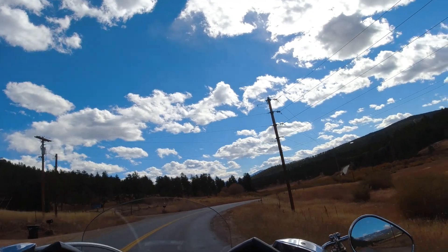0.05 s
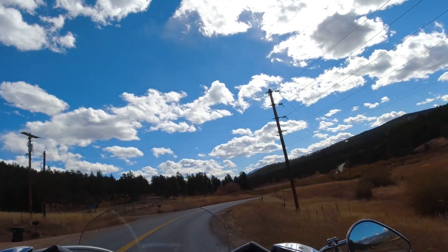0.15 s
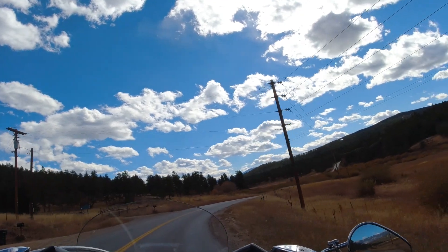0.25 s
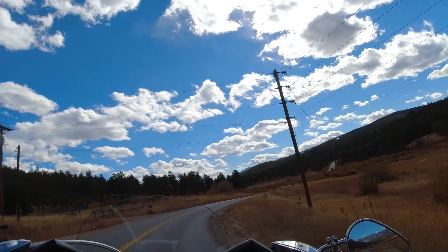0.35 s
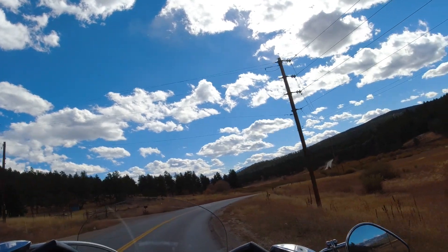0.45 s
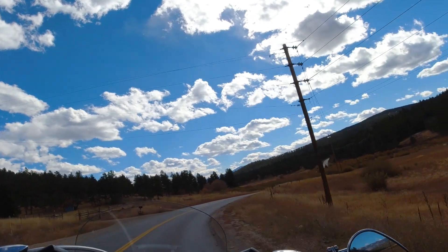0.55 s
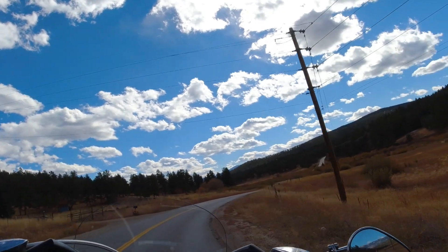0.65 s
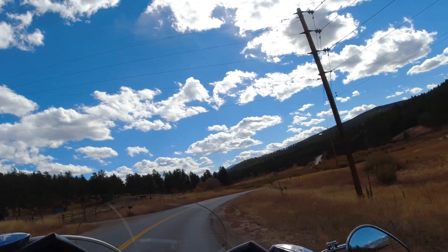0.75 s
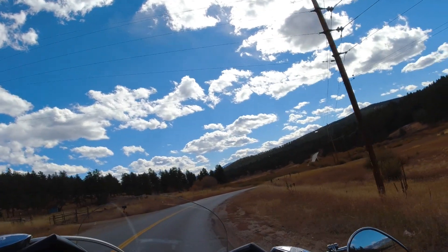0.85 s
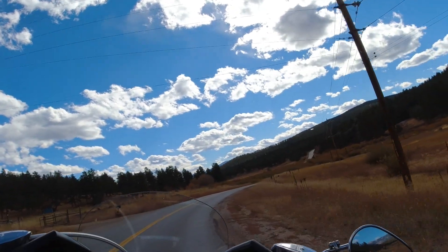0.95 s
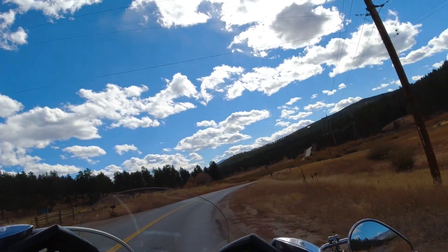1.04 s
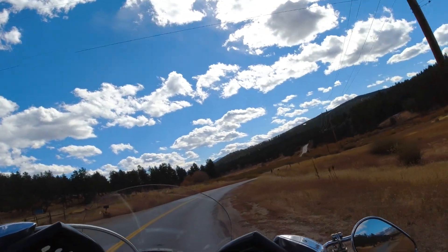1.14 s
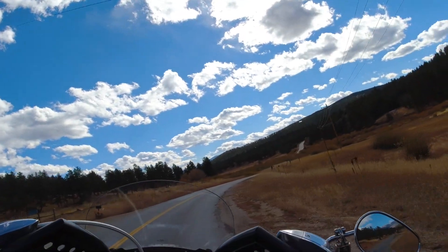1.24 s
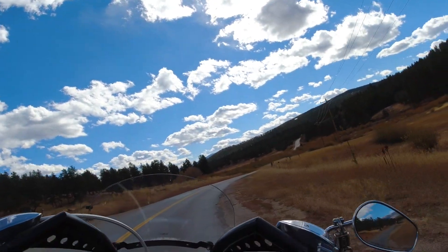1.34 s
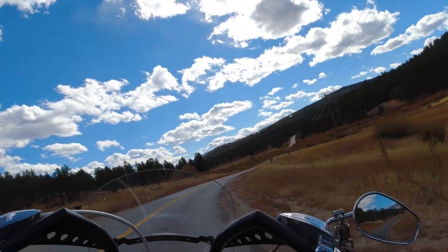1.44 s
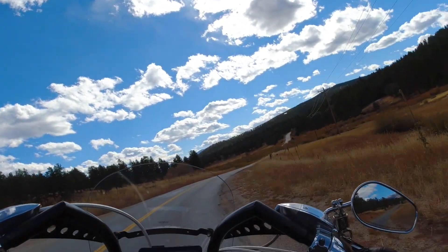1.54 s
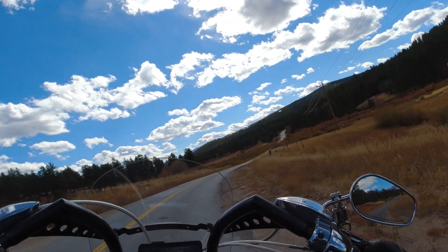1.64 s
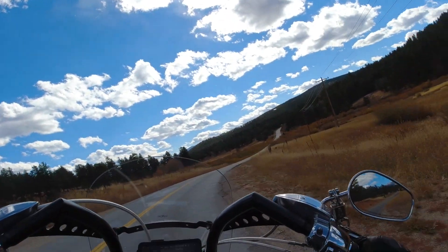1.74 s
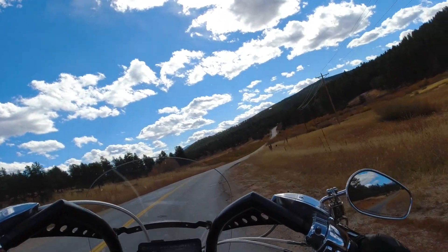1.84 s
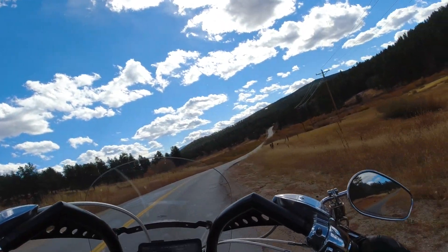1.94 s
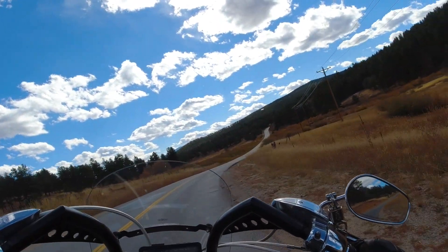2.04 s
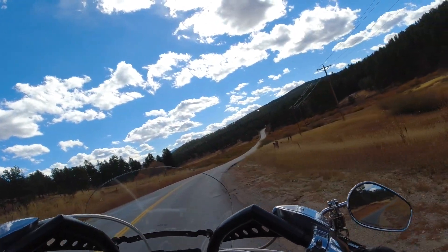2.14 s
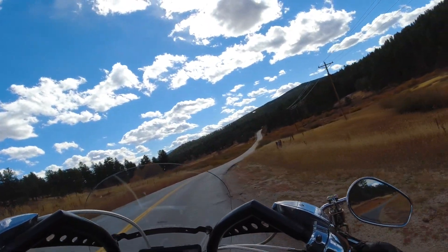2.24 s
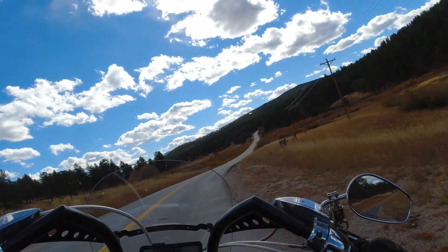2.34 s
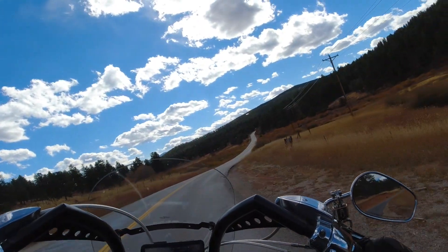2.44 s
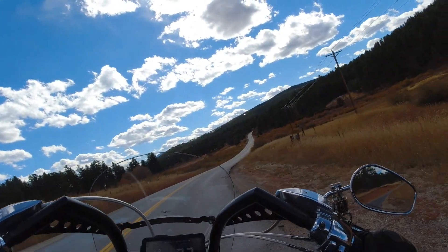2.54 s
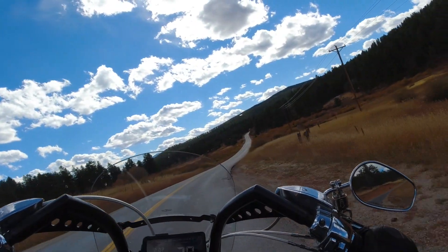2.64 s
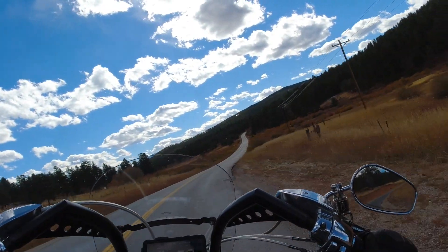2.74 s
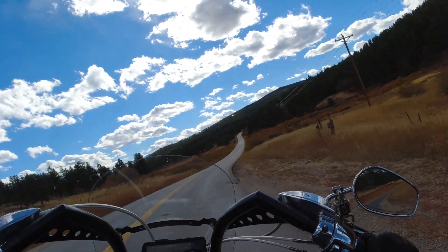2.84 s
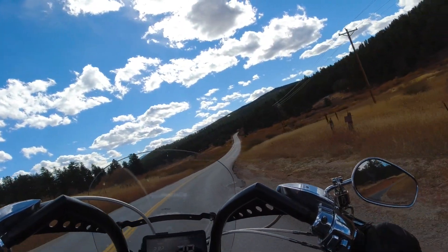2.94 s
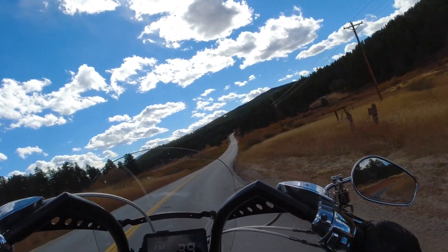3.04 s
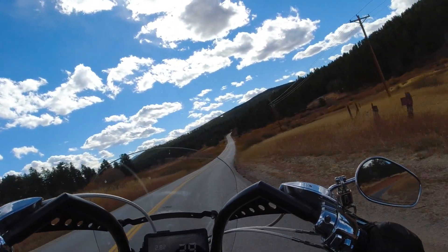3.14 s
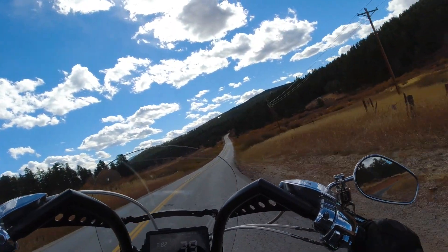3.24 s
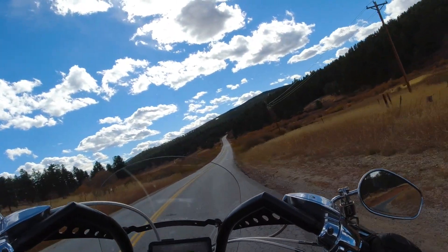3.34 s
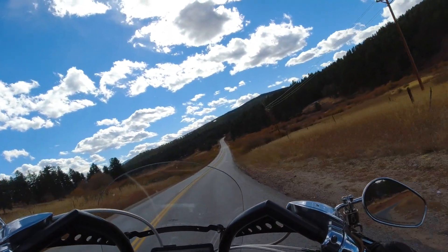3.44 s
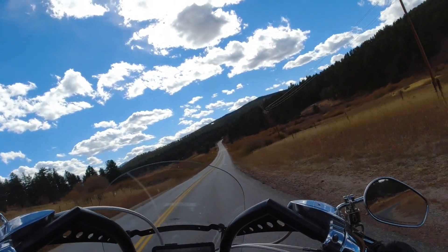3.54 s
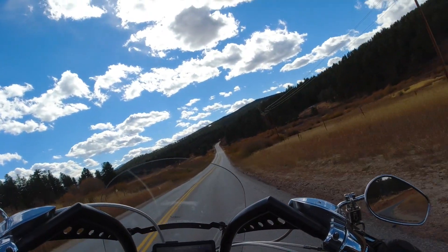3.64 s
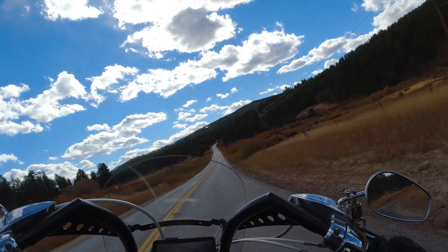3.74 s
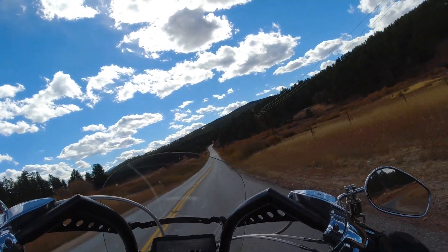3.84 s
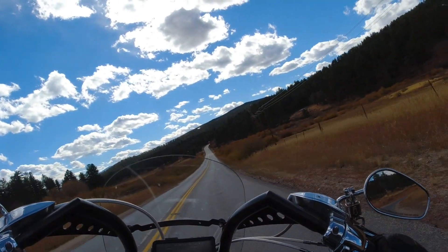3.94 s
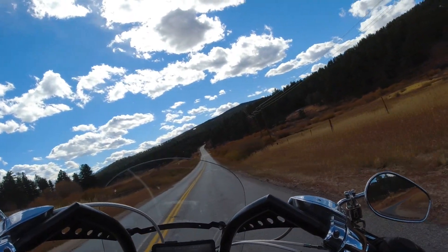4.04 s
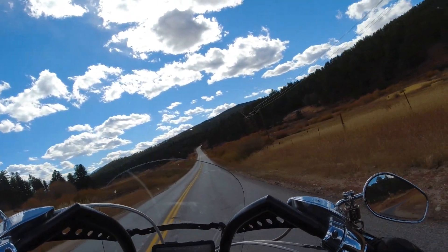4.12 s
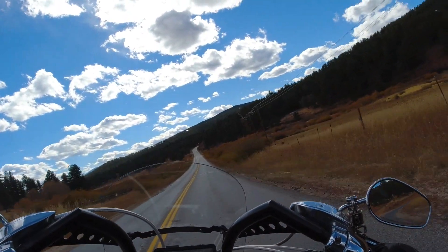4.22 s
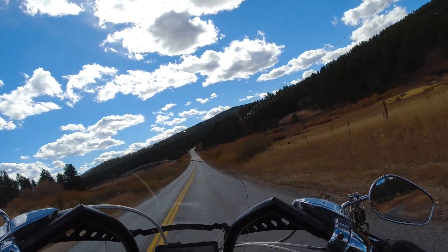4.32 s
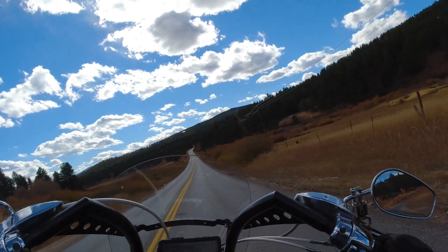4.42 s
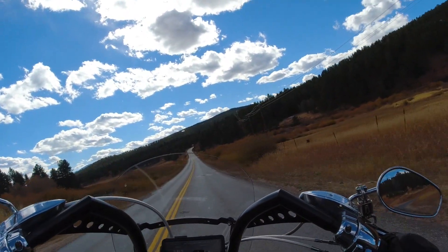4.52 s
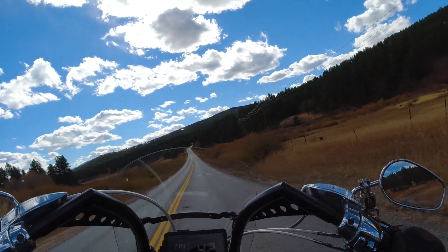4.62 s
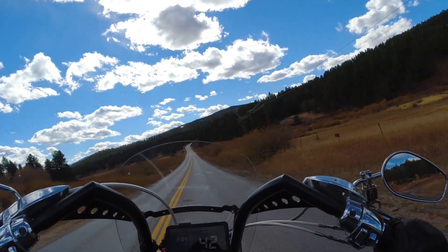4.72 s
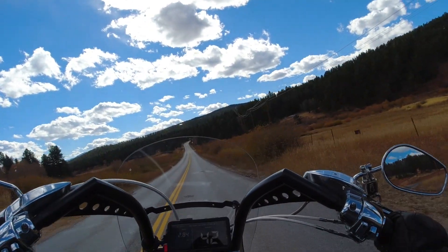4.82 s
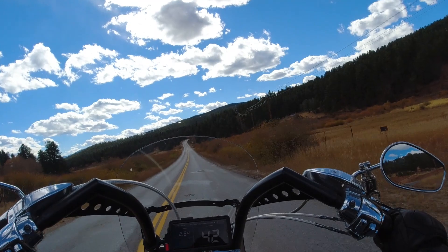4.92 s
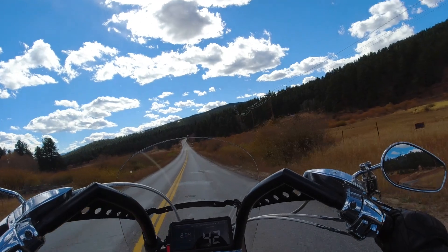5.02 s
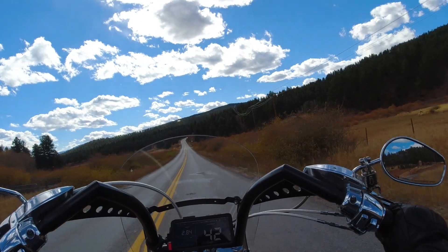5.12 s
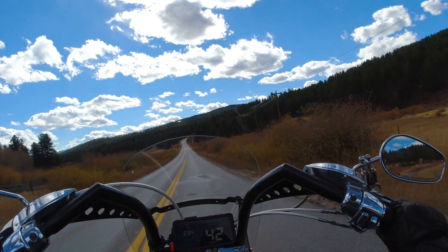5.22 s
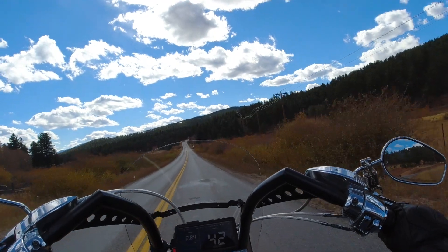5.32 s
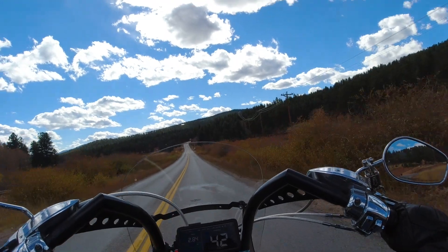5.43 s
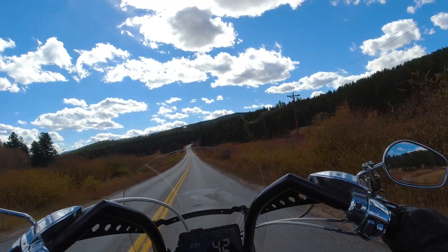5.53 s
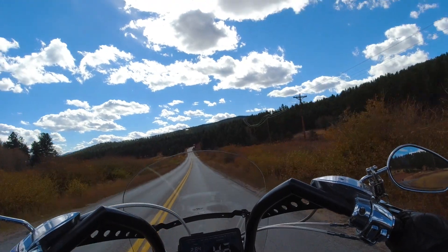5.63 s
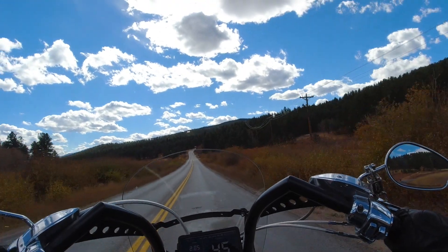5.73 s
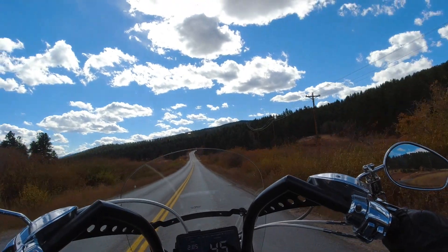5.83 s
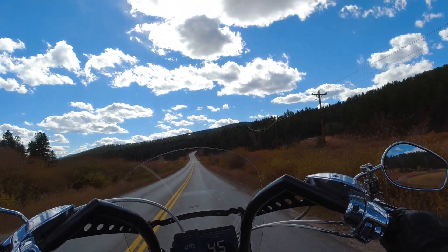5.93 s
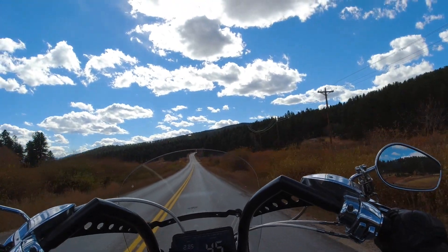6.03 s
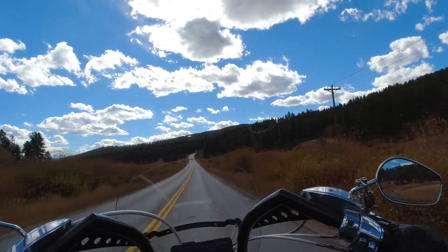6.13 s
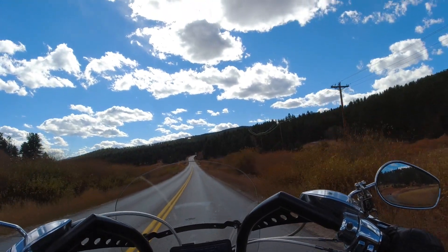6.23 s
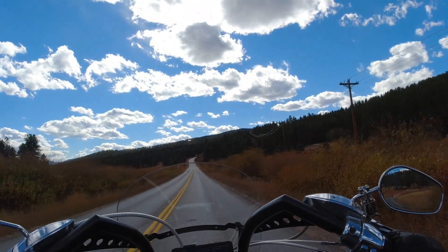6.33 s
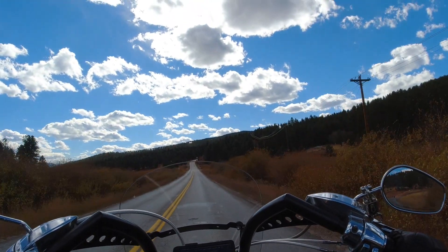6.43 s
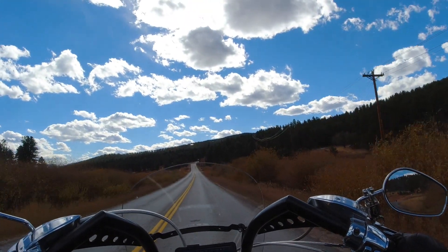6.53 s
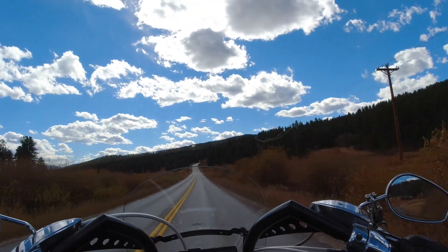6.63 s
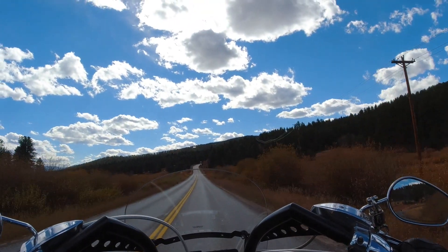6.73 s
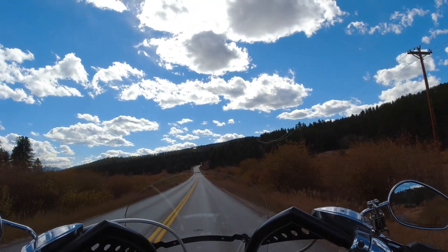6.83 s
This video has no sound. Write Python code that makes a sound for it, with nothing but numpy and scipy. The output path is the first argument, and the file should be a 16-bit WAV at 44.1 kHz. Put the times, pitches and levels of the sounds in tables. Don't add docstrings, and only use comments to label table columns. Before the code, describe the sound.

Close on-board sound of a large V-twin motorcycle on an open road, heard at the rider's chest. From 0 to 1.5 s it cruises with a heavy, uneven double thump, about sixteen pairs a second, over low buffeting wind and a steady rush of air and tyres. From 1.6 s the throttle opens a little, bringing more rasp, valve clatter and sparse crackles; a loose heat shield ticks more clearly between 1.9 and 2.9 s. The pace climbs gradually, with a stronger gust near 4 s. At about 4.8 s the engine opens up, louder, brighter and raspier, with rising gear whine. Around 5.3 s a bump gives a deep, dull knock with blasts of wind, and the low boom becomes fuller. The hard pull continues to roughly 6.6 s, about twenty-one pairs a second, then the throttle shuts and exhaust drops abruptly beneath the wind until the end at 6.9 s.

```python
import sys
import numpy as np
from scipy import signal
from scipy.fft import rfft, irfft, next_fast_len
from scipy.io import wavfile
from scipy.ndimage import uniform_filter1d

SR = 44100
rng = np.random.default_rng(int(sys.argv[2]) if len(sys.argv) > 2 else 0)


def nominal_scale(level):
    x = np.asarray(level, float) / 20
    return 10 ** x


def generate_wav(signal):
    frames = np.transpose(np.atleast_2d(signal))
    scaled = np.clip(frames, -1, 1) * 32767
    pcm = np.round(scaled).astype(np.int16)
    wavfile.write(sys.argv[1], SR, pcm)


N = 302967
FFT_SIZE = next_fast_len(N + SR)
HZ = np.arange(FFT_SIZE // 2 + 1) * SR / FFT_SIZE

# start_s, four-stroke cycle rate_hz
SPEED = [(0, 15.809), (0.7, 15.804), (1.4, 16.105), (2.2, 16.591), (2.6, 16.987), (3.3, 17.423),
         (3.7, 17.843), (4.2, 18.118), (4.9, 18.813), (5.7, 20.147), (6.5, 21.426), (6.87, 21.397)]
# start_s, level_db
THROTTLE = [(0, -10), (.3, -8), (.9, -10), (1.6, -5), (1.78, -1.5), (2.1, -3.5), (2.7, -1.3), (3.6, -2),
            (4.65, -0.5), (4.85, 4), (5.1, 9), (5.55, 12), (6.0, 11), (6.3, 11), (6.62, 10), (6.72, 0),
            (6.87, -16)]
# centre_s, extra_db, half_width_s
SURGES = [
    (.95, 1.5, 0.32),
    (2.7, 1.0, 0.13),
    (3.92, 1.5, .12),
    (4.75, 2, 0.19),
]
START_CYCLE, REFERENCE_HZ = -0.693, 18.2
REAR_FIRES = 315 / 720

# cruising level_db, db per db of throttle, db per hz of crank speed
THUMP_LAW, RING_LAW, SIZZLE_LAW = (-30, 0.26, 1), (-42.5, 0.46, 0.64), (-71.5, 0.33, 1.4)
SHIELD_LAW, BUFFET_LAW, RUSH_LAW = (-60, 0.78, 0.1), (-37.5, 0.1, 0.8), (-45, 0.34, 0.78)
RASP_DB = -44

# pitch_hz, level_db per hz
BUFFET = [(12, -1.5), (25, 1.5), (40, 1), (60, -10), (100, -21), (200, -15.5), (300, -26), (500, -28.5),
          (1500, -86)]
# pitch_hz, level_db per hz
RUSH = [(90, -4), (170, -0.5), (250, -7), (311, -10), (620, -15.5), (811, -26.5), (1250, -20.5),
        (1850, -25.5), (2300, -26.5), (2960, -33), (4980, -36.5), (6850, -65), (9590, -63), (11500, -67.5),
        (13900, -90)]
# centre_s, extra_db, half_width_s
GUSTS = [
    (.8, 3.5, 0.5),
    (2.45, 2.5, 0.43),
    (4.05, 8, .2),
    (5.14, 3, 0.03),
    (5.34, 16, 0.033),
    (5.49, 13, 0.055),
    (6.08, 4, 0.18),
    (6.492, 4, 0.057),
    (6.78, 2, 0.12),
]
GUST_IN_RUSH = 0.25

# start_s, level_db, pitch_hz, t60_s, sign
BUMP = [
    (5.28, -10.5, 21.8, 0.13, -1),
    (5.31, -10, 21, 0.14, 1),
    (5.316, -15.5, 103, .1, 1),
    (5.335, -18, 60, 0.19, -1),
    (5.351, -9.5, 94, 0.065, -1),
]

# order (multiple of cycle rate), cruising level_db, full-throttle level_db
WHINE = [(20, -61.5, -41.5), (23, -54.5, -49), (24, -56, -52.5), (26, -54.5, -47), (28, -54, -53.5),
         (31, -62, -49.5), (33, -63.5, -45)]

SHIELD_HZ, SHIELD_T60_S = 2654, 0.03
SHIELD_LOOSE = (1.9, 2.91, 0.08, 7.8)   # start_s, end_s, fade_s, extra_db

# pitch_hz, width_hz, level_db
CLATTER = [(3230, 290, -1), (3650, 550, 1.5), (4150, 610, -2), (4727, 530, -4), (5360, 500, -9.5),
           (6060, 600, -18)]
# pitch_hz, width_hz, level_db
SIZZLE = [(5660, 3200, -2), (7300, 4700, -14), (9000, 4000, -15.5)]
# pitch_hz, width_hz, level_db
RASP = [(477, 310, -4.5), (673, 177, 2), (1017, 370, -3), (1218, 266, 2.5), (1600, 640, -0.5),
        (1950, 540, -5), (2300, 320, -0.5), (2660, 550, -4.5)]
# start_s, extra_db, favoured_hz
CRACKS = [(1.745, 6, 2300), (2.405, 9, 4150), (2.64, 11.5, 4800), (2.665, 11.5, 2650), (3.334, 5.5, 1600),
          (3.39, 5, 1600), (3.81, 5.5, 3650), (3.925, 5, 2650), (4.881, 8.5, 1950), (5.97, 3, 1600),
          (6.285, 5.5, 1950)]
PUFF_LEAD_S = np.array([0.0022, 0.003])
PUFF_RISE_S, PUFF_HOLD_S = 0.0009, 0.0098
SIZZLE_OPENS_S, SIZZLE_OPEN_FADE_S, SIZZLE_OPEN_DB = 4.91, 0.02, 5.5
OVERRUN_HISS_S, OVERRUN_HISS_FADE_S, OVERRUN_HISS_DB = 6.65, 0.046, -9

# pitch_hz, cruising level_db, full-throttle level_db, t60_s
RING = [(370, -16.5, 1, 0.051), (369.7, -7.5, 1.5, 0.097), (435.5, -3, -1, 0.056), (485, -4, -9.5, 0.076),
        (602, -10, -7, 0.12), (709, -6.5, -15.5, 0.05)]
JOLT_S, JOLT_WIDTH_S, JOLT_RING_DB = 5.52, 0.29, 5

# delay_ms, strength
FRONT_PIPE = [(-3, 0.26), (4.5, -0.15), (21, 0.09)]
# delay_ms, strength
REAR_PIPE = [(-3.5, 0.18), (6.5, 0.13), (12.5, 0.13), (19.5, 0.085)]
REAR_SHARE = 0.79
MUFFLER_HZ, MUFFLER_T60_S, MUFFLER_GAIN = 238.6, 0.043, 0.15
# pitch_hz, width_hz, level_db
BODY = [(107.8, 7, -15), (128.8, 4.1, 5), (153.3, 19.4, -5.5), (208.2, 103, 4.5), (241.4, 29.5, -6),
        (281.4, 17.6, 7), (326.7, 61, -9)]
OVERRUN_S, OVERRUN_FADE_S, OVERRUN_DB = 6.7, 0.14, -8
BOOM_HZ, BOOM_T60_S = 103, 0.15
MOUNT_LIGHT_DB, MOUNT_CLEAR_DB, MOUNT_HOME_DB = -7.5, -30, -1
MOUNT_LIFTS_S, MOUNT_LIFT_FADE_S, MOUNT_HOME_S, MOUNT_HOME_FADE_S = 3.0, 1.0, 5.26, 0.087

# pitch_hz, level_db per hz
SELF_NOISE = [(5000, -34), (7500, -5), (10000, -11.5), (12500, -13), (14000, -44)]
SELF_NOISE_DB = -83


def rms_one(x):
    return x / np.sqrt(np.mean(x ** 2) + 1e-20)


def evened(x):
    return x / np.sqrt(uniform_filter1d(x ** 2, size=SR // 4) + 1e-20)


def in_time(rows):
    s, *columns = np.transpose(rows)
    return [np.interp(np.arange(N) / SR, s, column) for column in columns]


def ramp(start_s, fade_s):
    return np.clip((np.arange(N) / SR - start_s) / fade_s, 0, 1)


def swell(s, width_s):
    return np.exp(-((np.arange(N) / SR - s) / width_s) ** 2)


def through(x, response):
    return irfft(rfft(x, FFT_SIZE) * response, FFT_SIZE)[:N]


def mode(hz, t60):
    s, w = 2j * np.pi * HZ, 2 * np.pi * hz
    return w * s / ((s + np.log(1000) / t60) ** 2 + w * w)


def peak(hz, width, db):
    s = 1j * HZ
    above = s * s + s * width * nominal_scale(db / 2) + hz * hz
    below = s * s + s * width / nominal_scale(db / 2) + hz * hz
    return above / below


def coloured(spectrum):
    hz, db = np.transpose(spectrum)
    response = nominal_scale(np.interp(np.log(HZ + 1), np.log(hz), db))
    return rms_one(through(rng.standard_normal(N), response))


def drift(rate_hz):
    r = np.exp(-2 * np.pi * rate_hz / SR)
    noise = rng.standard_normal(N + SR // 2)
    return rms_one(signal.lfilter([1], [1, -2 * r, r * r], noise)[-N:])


def clicks(seconds, sizes):
    out, at = np.zeros(N), np.round(seconds * SR).astype(int)
    inside = (at >= 0) & (at < N)
    out[at[inside]] = sizes[inside]
    return out


def law(rule):
    db, per_db, per_hz = rule
    return db + per_db * in_time(THROTTLE)[0] + per_hz * (in_time(SPEED)[0] - REFERENCE_HZ)


def crank():
    return np.arange(N) / SR, START_CYCLE + np.cumsum(in_time(SPEED)[0]) / SR


def firings(jitter_ms=0.09):
    s, turns = crank()
    cycle = np.arange(-1, int(turns[-1]) + 1)[:, None] + np.array([0, REAR_FIRES])
    times = np.interp(cycle, turns, s, left=-1, right=99)
    return times + jitter_ms / 1000 * rng.standard_normal(times.shape)


def air_db():
    gust_db = sum(db * swell(s, width) for s, db, width in GUSTS)
    return law(BUFFET_LAW) + gust_db, law(RUSH_LAW) + GUST_IN_RUSH * gust_db


def wind(buffet_db, rush_db):
    buffet = coloured(BUFFET) * nominal_scale(buffet_db + 1.0 + 1.5 * drift(8))
    rush = coloured(RUSH) * nominal_scale(rush_db + 6.5 + 1.4 * drift(22))
    return buffet + rush


def bump():
    out, t = 0, np.arange(N) / SR
    for s, db, hz, t60, sign in BUMP:
        age = np.maximum(t - s, 0)
        out = out + np.sign(sign) * nominal_scale(db - 60 * age / t60) * np.sin(2 * np.pi * hz * age)
    return out


def whine(throttle_db):
    load, turns, waver = np.clip(throttle_db / 10, -1, 1), crank()[1], drift(3.6)
    out = 0
    for order, cruise_db, open_db in WHINE:
        db = cruise_db + (open_db - cruise_db) * load.clip(0) + 8 * load.clip(None, 0)
        db = db + 2.3 * np.roll(waver, rng.integers(N))
        wobble = 0.32 * np.roll(waver, rng.integers(N))
        out = out + nominal_scale(db) * np.sin(2 * np.pi * np.round(order) * turns + wobble)
    return out


def shield_db():
    start, end, fade, db = SHIELD_LOOSE
    return law(SHIELD_LAW) + db * (ramp(start - fade, fade) - ramp(end - fade, 2 * fade))


def heat_shield(times):
    sizes = nominal_scale(4.2 * rng.standard_normal(times.size))
    s = 1j * HZ / SHIELD_HZ
    soft = s ** 2 / (1 + s) ** 4
    tick = through(clicks(times.ravel(), sizes), mode(SHIELD_HZ, SHIELD_T60_S) * soft)
    return nominal_scale(shield_db()) * rms_one(tick)


def jet(times, strength_db, level_db, resonances, snap, cracks, shift_db, leak):
    age = np.arange(int(0.04 * SR)) / SR
    held = np.exp(-(age / PUFF_HOLD_S) ** 2)
    puff = (1 - np.exp(-age / PUFF_RISE_S)) * (held + snap * np.exp(-age / 0.0005))
    grain = rng.standard_normal((2, N)) * nominal_scale(1.05 * drift(430))
    out = 0
    for k, (hz, width, db) in enumerate(resonances):
        colour_db = shift_db * rng.standard_normal(times.shape)
        for s, extra_db, favoured_hz in cracks:
            favour = 0.5 + (abs(hz / favoured_hz - 1) < 0.1)
            colour_db += extra_db * (abs(times - s) < 0.01) * favour
        sizes = nominal_scale(db + strength_db + colour_db) * [1, 0.98]
        blows = clicks((times - PUFF_LEAD_S).ravel(), sizes.ravel())
        gate = signal.fftconvolve(blows, puff)[:N]
        gate += leak * nominal_scale(db)
        band = 1 / (1 + 1j * (HZ - hz) / (width / 2)) ** 3
        out = out + through(gate * grain[k % 2], band)
    return nominal_scale(level_db) * rms_one(out)


def valve_clatter(times, strength_db, rasp_db):
    leak = 0.11 * nominal_scale(0.5 * (rasp_db - RASP_DB))
    return jet(times, strength_db, 0.6 * rasp_db - 30.5, CLATTER, 0.46, CRACKS, shift_db=4.5, leak=leak)


def exhaust_sizzle(times, strength_db):
    db = law(SIZZLE_LAW) + OVERRUN_HISS_DB * ramp(OVERRUN_HISS_S, OVERRUN_HISS_FADE_S)
    db = db + SIZZLE_OPEN_DB * ramp(SIZZLE_OPENS_S, SIZZLE_OPEN_FADE_S)
    return jet(times, strength_db, db + 3.0 + drift(8), SIZZLE, 0, [], shift_db=3.0, leak=0.5)


def exhaust_rasp(times, strength_db, rasp_db):
    leak = 0.1 * nominal_scale(0.4 * (rasp_db - RASP_DB))
    return jet(times, strength_db, rasp_db - 3.0, RASP, 0.22, CRACKS, shift_db=3.0, leak=leak)


def pipe_ring(times, strength_db, load):
    s, turns = crank()
    steady_s = (turns + 1) / REFERENCE_HZ
    struck = np.interp(times.ravel() - 0.0015, s, steady_s, left=-1, right=99)
    out = 0
    for k, (hz, cruise_db, open_db, t60) in enumerate(RING):
        db = cruise_db + (open_db - cruise_db) * load
        sizes = nominal_scale(db + strength_db + rng.standard_normal(times.shape))
        out = out + (-1) ** k * through(clicks(struck, sizes.ravel()), mode(hz, t60))
    out = through(out, 1 / (1 + 1j * HZ / 1100) ** 3)
    out = np.interp(np.interp(np.arange(N) / SR, s, steady_s) * SR, np.arange(N), out)
    ring_db = law(RING_LAW) + JOLT_RING_DB * swell(JOLT_S, JOLT_WIDTH_S)
    return nominal_scale(ring_db - 7.0) * evened(out)


def mount_db():
    before = MOUNT_LIGHT_DB + (MOUNT_CLEAR_DB - MOUNT_LIGHT_DB) * ramp(MOUNT_LIFTS_S, MOUNT_LIFT_FADE_S)
    return before + (MOUNT_HOME_DB - before) * ramp(MOUNT_HOME_S, MOUNT_HOME_FADE_S)


def late(ms):
    return np.exp(-2j * np.pi * HZ * ms / 1000)


def thump(times, strength_db):
    thump_db = law(THUMP_LAW) + OVERRUN_DB * ramp(OVERRUN_S, OVERRUN_FADE_S)
    thump_db = thump_db + sum(db * swell(s, width) for s, db, width in SURGES)
    wave = mode(117, 0.034) / (1 + 1j * HZ / 200) ** 2
    pipes, first = 0, 0
    for k, (pipe, share) in enumerate([(FRONT_PIPE, 1), (REAR_PIPE, REAR_SHARE)]):
        train = clicks(times[:, k], nominal_scale(strength_db[:, k]))
        returns = sum(gain * late(ms) for ms, gain in pipe)
        pipes = pipes + through(train, wave * returns)
        first = first + share * through(train, wave * late(pipe[0][0]))
    pipes = pipes + MUFFLER_GAIN * through(first, mode(MUFFLER_HZ, MUFFLER_T60_S))
    pipes = through(pipes, np.prod([peak(*row) for row in BODY], axis=0))
    scale = nominal_scale(thump_db + 1.5) / np.sqrt(np.mean(pipes ** 2))
    boom = through(first * scale * nominal_scale(mount_db() - 17.0), mode(BOOM_HZ, BOOM_T60_S))
    return pipes * scale + boom


def scene():
    throttle_db = in_time(THROTTLE)[0]
    rasp_db = RASP_DB + throttle_db
    times = firings()
    strength_db = 0.46 * rng.standard_normal(times.shape)
    effort_db = np.interp(times * SR, np.arange(N), rasp_db)
    load = np.clip((effort_db + 44.5) / 8.7, 0, 1)
    around = wind(*air_db()) + bump()
    machinery = whine(throttle_db) + heat_shield(times) + valve_clatter(times, strength_db, rasp_db)
    exhaust = exhaust_sizzle(times, strength_db) + exhaust_rasp(times, strength_db, rasp_db)
    exhaust = exhaust + pipe_ring(times, strength_db, load) + thump(times, strength_db)
    return (around + machinery + exhaust)[None]


def roll_off(x):
    return signal.sosfilt(signal.butter(12, 14030, fs=SR, output="sos"), x)


def record(dry):
    dull = signal.sosfilt(signal.butter(6, 12600, fs=SR, output="sos"), dry)
    dull = dull + nominal_scale(SELF_NOISE_DB) * coloured(SELF_NOISE)
    dull = dull * np.minimum(1, np.arange(N, 0, -1) / (SR / 200))
    return roll_off(dull)


dry = scene()
out = record(dry)
generate_wav(out)
```